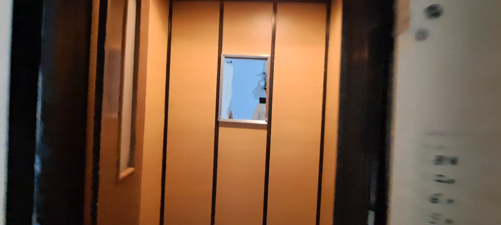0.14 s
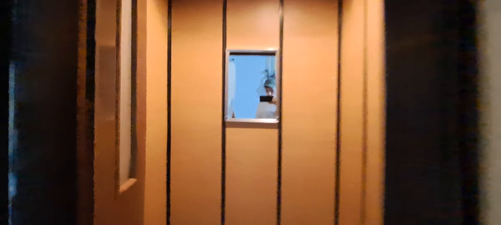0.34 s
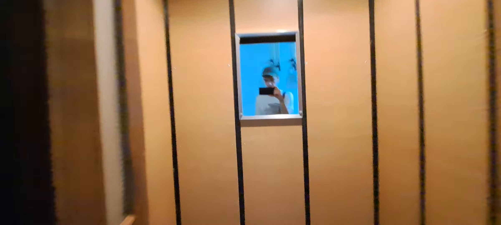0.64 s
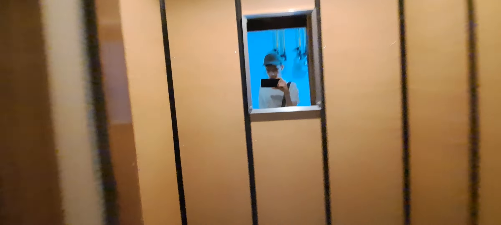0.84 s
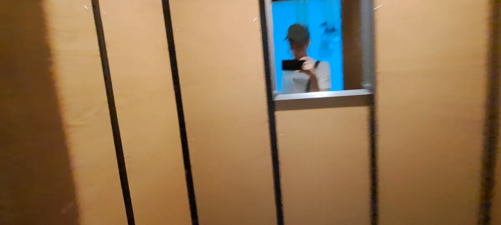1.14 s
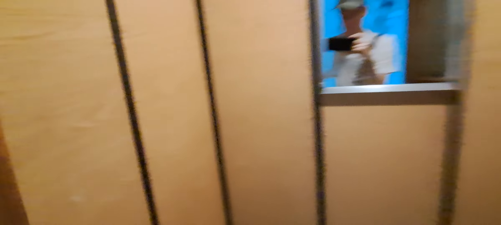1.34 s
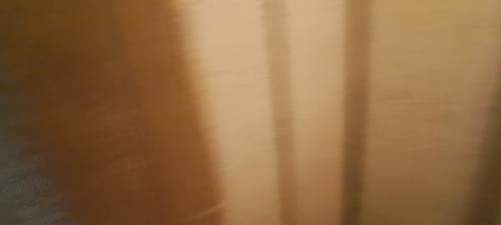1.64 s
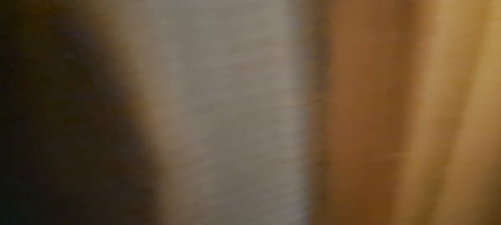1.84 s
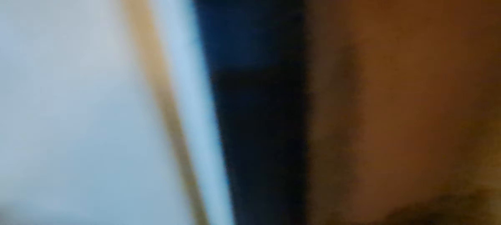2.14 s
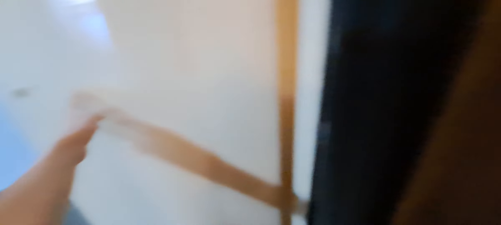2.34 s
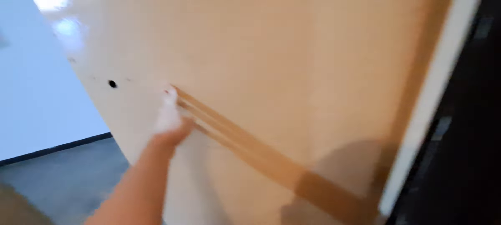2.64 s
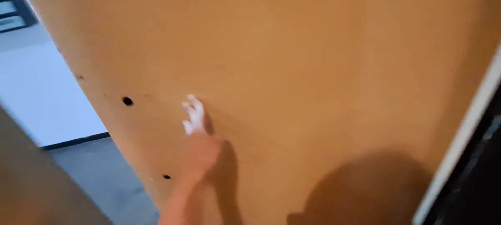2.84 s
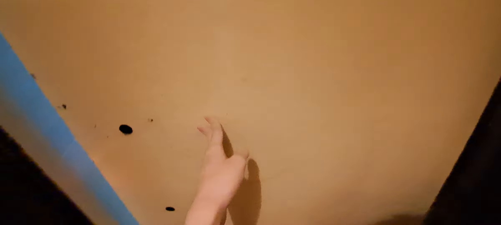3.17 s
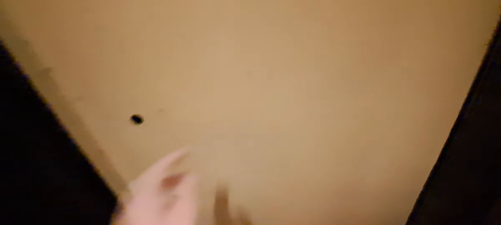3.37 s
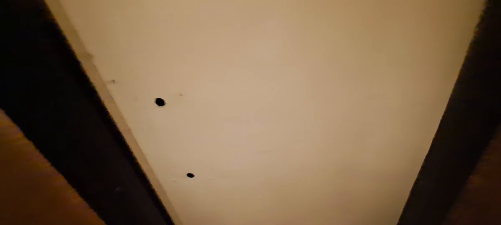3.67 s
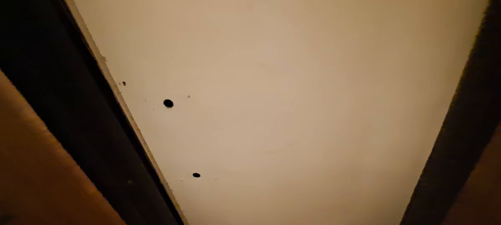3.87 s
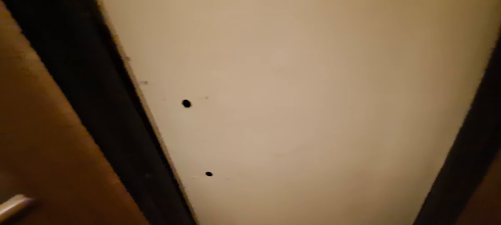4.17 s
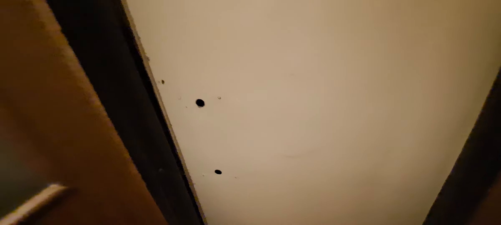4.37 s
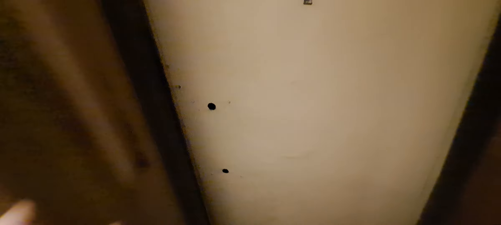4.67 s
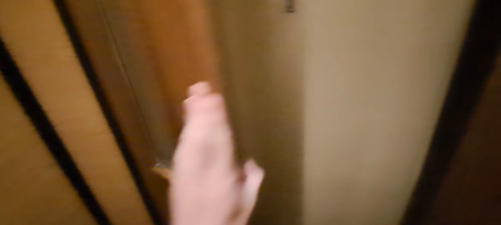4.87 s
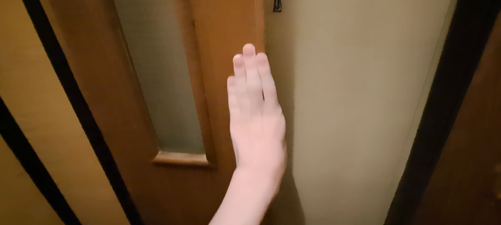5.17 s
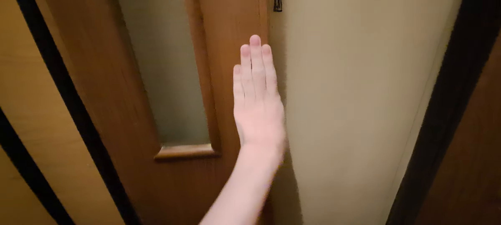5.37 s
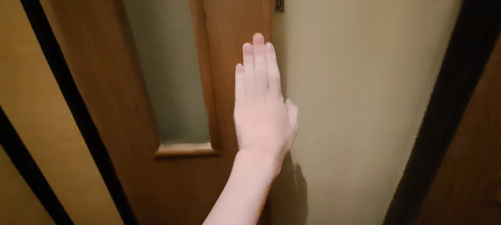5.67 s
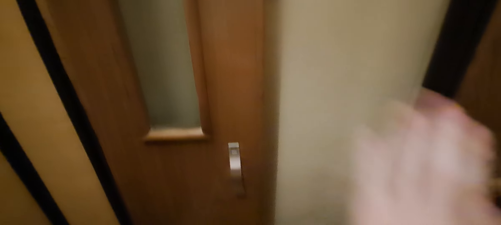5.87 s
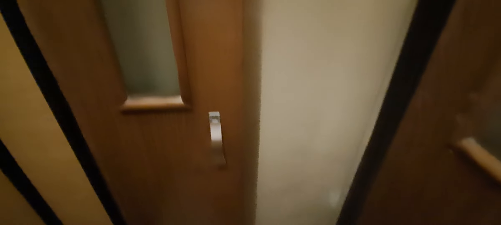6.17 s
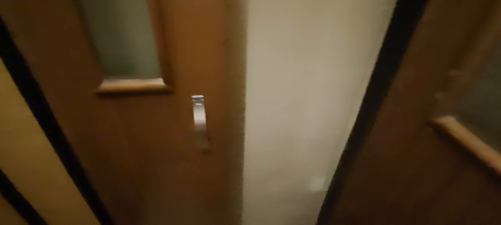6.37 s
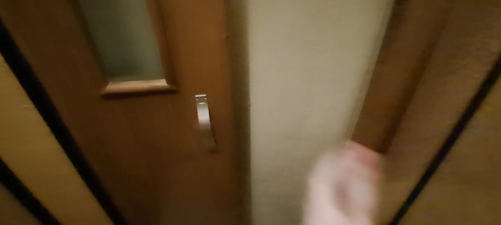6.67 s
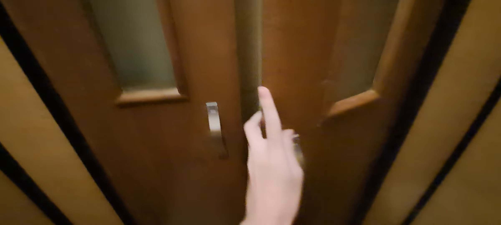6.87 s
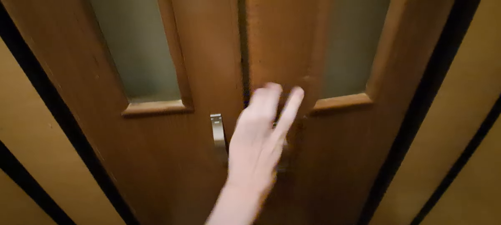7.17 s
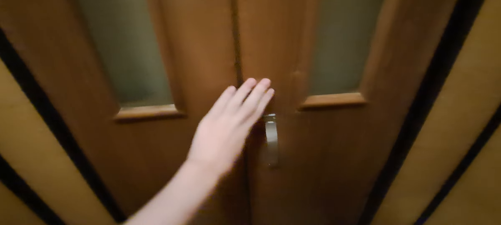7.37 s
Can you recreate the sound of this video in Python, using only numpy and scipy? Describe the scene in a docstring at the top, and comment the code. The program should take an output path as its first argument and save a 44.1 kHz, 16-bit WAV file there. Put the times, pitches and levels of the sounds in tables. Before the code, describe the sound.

Someone steps into a small old lift with a loud clack and a deep thump of the floor. Latches click and rattle, and the steel landing door bangs shut with a low ring. Wooden inner doors then clatter loudly and close with a last, softer knock. Hands, clothes and shoes rub in between, while faint stairwell air fades away. Hand-held stereo microphones hear it close in the narrow, echoing cabin.

```python
"""Latches clack and rattle as someone steps into a small old lift car, pulls the steel landing door
shut and folds the wooden car doors in. Each blow makes the panels ring low and shifts of weight bounce
the floor. There are rubbing strokes of hands, clothes and shoes, plus short bursts of noise on four
of the clacks. The airy noise of the stairwell fades as the doors close. A hand-held pair of
microphones hears it all in the narrow, echoing cabin."""
import sys
import numpy as np
from scipy import signal
from scipy.fft import rfft, irfft, next_fast_len
from scipy.io import wavfile
from scipy.ndimage import uniform_filter1d

SR = 44100
rng = np.random.default_rng(int(sys.argv[2]) if len(sys.argv) > 2 else 0)


def unload_audio(sound):
    """Save the sound as a 16-bit wav file, at the path given as the first command line argument."""
    columns = np.transpose(np.atleast_2d(sound))
    # keep every value between -1 and 1, then stretch to whole-number steps
    steps = np.round(np.clip(columns, -1, 1) * 32767)
    wavfile.write(sys.argv[1], SR, steps.astype(np.int16))


N = 331191

# the stairwell, shut out as the doors close: t/s, air noise/dB, share of the clacks that echoes/dB
STAIRWELL_LEVELS = [(0, -50.5, -7.5), (1.1, -57, -19.5), (2., -65, -10.5), (3.1, -58.5, -19),
                    (3.3, -67, -25), (5.3, -73, -27), (7.51, -81.5, -20.5)]


def amp(db):
    """Turns decibels into a gain."""
    return 10 ** (np.asarray(db) / 20)


def unit_level(x):
    """Scales a sound to an average (rms) level of 1."""
    return x / np.sqrt(np.mean(x ** 2) + 1e-20)


def at_pitch(points, hz):
    """Looks up a table's value at any frequency, on a log scale."""
    f, value = np.transpose(points)
    return np.interp(np.log(hz + 1), np.log(f + 1), value)


def curves(rows):
    """Joins a table's points in time with straight lines, one curve a column."""
    times, *columns = np.transpose(rows)
    return [np.interp(np.arange(N) / SR, times, column) for column in columns]


def swells(peak_s, rise_s, fall_s, db):
    """Summed power of humps that climb 20 dB in rise_s and sink 20 dB in fall_s (2 ms at least)."""
    late_s = np.arange(0, N / SR + .002, .001)[:, None] - peak_s
    rise_s, fall_s = np.maximum(rise_s, .002), np.maximum(fall_s, .002)
    drop_db = 20 * np.where(late_s < 0, -late_s / rise_s, late_s / fall_s)
    power = (amp(db - np.minimum(drop_db, 200)) ** 2).sum(1)
    return np.interp(np.arange(N) / SR, np.arange(len(power)) / 1000, power)


def filtered(x, gain):
    """Filters a sound by a gain given as a function of frequency."""
    size = next_fast_len(N)
    return irfft(rfft(x, size) * gain(np.fft.rfftfreq(size, 1 / SR)), size)[..., :N]


def band(low_hz, high_hz):
    """Gain that lets one band through, coloured by the microphone housing."""
    # colour of the housing: f/Hz, level/dB
    housing = [(310, -15.5), (520, -5.5), (618, -8), (673, -8.5), (1060, -6), (1280, -5.5), (1360, -5),
               (2210, -2.5), (2820, -9), (4730, -12), (5950, -23.5), (7380, -21), (9970, -28.5),
               (13500, -17), (16000, -24)]
    edges = lambda f: np.sqrt((1 + (low_hz / (f + 1)) ** 10) * (1 + (f / high_hz) ** 10))
    return lambda f: amp(at_pitch(housing, f)) / edges(f)


def grainy_noise(grain_db):
    """Stereo noise, alike on both sides in the bass, whose level flickers by about grain_db."""
    # how alike left and right are: f/Hz, likeness (1 same, 0 unrelated, -1 opposite)
    likeness = [(60, 0.87), (180, 1), (550, 0.57), (1650, -0.53), (4970, 0.061), (15000, -0.037)]
    alike = lambda f: np.clip(at_pitch(likeness, f), -1, 1)
    left, other = rng.standard_normal((2, N))
    right = filtered(left, alike) + filtered(other, lambda f: np.sqrt(1 - alike(f) ** 2))
    flicker = unit_level(uniform_filter1d(rng.standard_normal(N), size=90))
    return np.array([left, right]) * amp(grain_db * flicker)


def stairwell_air():
    """Distant air noise that fades as the doors shut it out."""
    # colour of the air noise: f/Hz, level/dB
    colour = [(18, -50), (30, -26.5), (58, -14.5), (165, 5.5), (282, -9.5), (351, -27), (420, -27.5),
              (730, -5.5), (2360, -16.5), (3370, -39.5), (6000, -42.5), (7800, -77), (13200, -120)]
    air = filtered(grainy_noise(grain_db=1.4), lambda f: amp(at_pitch(colour, f)))
    return amp(curves(STAIRWELL_LEVELS)[0]) * unit_level(air)


def latch_clacks():
    """Latches and door edges hit: a rattle dies away in six bands and the part rings at two pitches."""
    # clacks: t/s, clank/dB, mid/dB, upper/dB, treble/dB, low ring/Hz, low ring/dB, high ring/Hz,
    # rattle t60/s (time to fade by 60 dB), left over right/dB
    clacks = [(0.439, -56, -62, -61, -56, 1120, -61.5, 2400, 0.34, -1.5),
              (0.714, -54, -74, -69.5, -78, 830, -50, 2390, 0.091, -1),
              (0.9014, -54.5, -44.5, -64.5, -66.5, 605, -48, 1920, .17, 1),
              (1.0997, -44, -41, -53.5, -56.5, 490, -49, 2040, 0.065, -1.5),
              (1.1192, -51, -51, -50, -46, 1424, -49.5, 2380, 0.49, 2.5),
              (1.232, -42, -39, -68, -56, 1080, -36.5, 1700, 0.21, 5.5),
              (1.268, -24, -28.5, -40, -51.5, 1620, -33.5, 1860, 0.17, 0),
              (1.295, -14, -17.5, -26.5, -24, 1540, -19, 2140, 0.063, 3.5),
              (1.3284, -27.5, -23, -36.5, -40.5, 640, -26.5, 1640, .13, -1.5),
              (1.707, -47.5, -52, -63, -73, 490, -50, 2260, .14, -6.5),
              (1.813, -55.5, -67, -60, -68, 1040, -62, 2100, 0.3, -1),
              (2.16, -59.5, -54.5, -61, -56, 543, -66, 2130, 0.19, 1.5),
              (2.42, -53.5, -51, -54.5, -68, 974, -53, 2100, 0.31, 0),
              (2.546, -49, -51.5, -55, -45.5, 637, -47.5, 2070, 0.17, 2),
              (2.576, -40, -49, -46.5, -35, 1070, -50, 1980, 0.12, 0),
              (2.629, -45.5, -47, -48, -39, 560, -44, 2200, 0.07, 1.5),
              (2.685, -41.5, -54, -45, -46, 564, -36, 2350, 0.1, 3.5),
              (2.7248, -40, -40, -37.5, -34.5, 556, -35, 2240, 0.17, 0),
              (3.1092, -37, -36.5, -46.5, -61.5, 1609, -38, 1930, 0.7, 3),
              (3.116, -33.5, -42, -50, -66, 1500, -37.5, 2045, .1, 3.5),
              (3.1848, -19.5, -18, -29, -37.5, 1514, -17.5, 1880, .13, .5),
              (3.31, -48, -38, -57.5, -62.5, 660, -37, 1820, 0.19, -2),
              (3.531, -51, -43, -57.5, -80, 642, -44.5, 2390, 0.22, -.5),
              (3.933, -45, -47.5, -47, -36, 1520, -41.5, 1690, 0.42, 1),
              (4.0358, -38, -41, -50, -69, 810, -50, 2240, .17, -1),
              (4.0643, -39.5, -36, -44.5, -39.5, 850, -44, 1900, 0.16, -0.5),
              (4.204, -63, -58, -77, -85, 820, -58, 2360, .18, -3),
              (4.252, -55, -49, -65, -67, 510, -54, 2250, 0.16, 0),
              (4.373, -42, -49.5, -43.5, -50, 1059, -40.5, 1720, 0.16, 1),
              (4.439, -41, -51, -47.5, -46.5, 1146, -35.5, 2230, 0.13, 3.5),
              (4.5495, -48.5, -54.5, -48, -49, 967, -55, 2402, 0.31, 2),
              (4.952, -69, -84, -69, -64, 782, -62, 2163, 0.15, 3.5),
              (5.035, -39.5, -38.5, -33.5, -39, 1650, -32.5, 2125, 0.099, 1.5),
              (5.3449, -36.5, -25.5, -38, -45.5, 585, -30, 2312, 0.19, 0.5),
              (5.428, -21.5, -28, -23.5, -37, 1480, -23.5, 2520, 0.14, 4.5),
              (5.4461, -20, -16.5, -19, -24.5, 490, -24.5, 1980, 0.052, 0),
              (5.464, -22.5, -21, -26, -27, 460.5, -29.5, 2230, 0.21, 2.5),
              (5.5621, -24.5, -34, -30, -22.5, 1650, -30.5, 3010, 0.16, -0.5),
              (5.6189, -21.5, -24, -28, -26, 1270, -23.5, 2310, .14, 1),
              (5.696, -31.5, -37.5, -41, -36, 512, -41, 2980, 0.047, 5),
              (5.728, -22, -35, -28.5, -23, 1412, -36.5, 2200, 0.11, 1),
              (5.788, -29.5, -33, -48, -38.5, 1463, -32.5, 2283, 0.15, 2),
              (5.849, -41, -43, -41, -36.5, 1680, -36, 2180, 0.15, -0.5),
              (5.999, -53.5, -47, -64, -79, 890, -57.5, 2127, 0.14, -3.5),
              (6.08, -58, -57, -79, -73, 513, -72, 2135, 0.095, 2.5),
              (6.1875, -56.5, -74.5, -61.5, -78, 1595, -67, 2190, .1, -3),
              (6.394, -68, -66, -63, -78, 776, -67, 2260, 0.25, -3.5),
              (6.476, -58.5, -70, -62.5, -81, 1610, -72.5, 2665, .11, -2.5),
              (6.543, -57, -56, -80, -80, 597, -55, 2217, 0.16, -2),
              (6.7416, -66, -59, -98, -83, 650, -49, 1884, 0.23, -1.5),
              (7.056, -66, -74, -71.5, -68, 501, -81.5, 2050, .17, -1),
              (7.1678, -52, -83.5, -84.5, -76, 1162, -52, 2080, 0.28, -4),
              (7.273, -59.5, -72, -70, -72, 1180, -70, 2096, .12, -2.5),
              (7.3896, -33.5, -38, -50, -63.5, 1518, -42.5, 1990, 0.24, 3),
              (7.417, -36.5, -32, -40, -42.5, 1580, -43, 2210, 0.26, 2)]
    # the two in-between bands against their neighbours' mean: mid to clank/dB, clank to upper/dB
    gap_db = [-9.5, -10.5]
    rise_s, chatter_s = 0.0052, 0.0039
    snap_db, snap_s = 2.5, 0.0048  # extra bite at first contact
    bands = [band(1900, 2500), band(230, 992), band(4600, 6000), band(9000, 25000),  # clank to treble
             band(1200, 1900), band(2500, 4600)]  # in between
    powers, rings = np.zeros((6, 2, N)), np.zeros((2, N))
    t = np.arange(SR // 2) / SR
    rattle = grainy_noise(grain_db=2.)
    for time_s, clank, mid, upper, treble, low_hz, low_db, high_hz, t60, pan_db in clacks:
        start = round((time_s - .003) * SR)  # each clack starts sounding 3 ms before its listed time
        age = t[:N - start]
        span = slice(start, start + len(age))
        sides_db = np.array([[pan_db / 2], [-pan_db / 2]])
        attack = (1 - np.exp(-age / rise_s)) * amp(sides_db + snap_db * np.exp(-age / snap_s))
        fading_s = np.maximum(age - chatter_s, 0)
        treble_t60 = 0.083 + 0.43 * t60
        band_db = clank, mid, upper, treble, (clank + mid) / 2 + gap_db[0], (clank + upper) / 2 + gap_db[1]
        band_t60 = t60, 1.43 * t60, (t60 + treble_t60) / 2, treble_t60, t60, t60
        for power, db, decay_s in zip(powers, band_db, band_t60):
            power[:, span] += (attack * amp(db - 60 * fading_s / decay_s)) ** 2
        for hz, db, width_hz in (low_hz, low_db, 170.), (high_hz, clank - 3.5, 450.):
            radius = np.exp(-np.pi * width_hz / SR)
            resonator = [1, 0, -1, 1, -2 * radius * np.cos(2 * np.pi * hz / SR), radius ** 2]
            ring = signal.sosfilt([resonator] * 2, rattle[:, span])  # twice, for a clearer pitch
            rings[:, span] += unit_level(ring) * attack * amp(db - 60 * fading_s / (0.67 * t60))
    return rings + sum(np.sqrt(power) * unit_level(filtered(rattle, gain))
                       for power, gain in zip(powers, bands))


def floor_bounce():
    """Shifts of weight jolt the floor: a deep tone with a weak overtone and a loose rumble."""
    # jolts: peak t/s, level/dB, fall/s
    jolts = [(.44, -58, 0.5), (.58, -47, -0.1), (.84, -46, -2.5), (1.12, -32.5, 0.2), (1.335, -11, 0.23),
             (1.44, -23.5, 0.16), (1.495, -17, .08), (1.64, -27, 0.24), (1.81, -32.5, .3),
             (1.9, -38, -0.36), (2.09, -45, 0.6), (2.24, -43, 1), (2.39, -42, 0.2), (2.71, -37, -0.2),
             (2.8, -31.5, 0.18), (2.97, -34, -0.3), (3.14, -36, 0.34), (3.2, -28, 0.22), (3.3, -38, 0.4),
             (3.47, -37, -0.1), (3.64, -37.5, -0.2), (3.81, -41, 0.9), (4.04, -25.5, 0.17),
             (4.31, -33, 0.12), (4.44, -27.5, 0.24), (4.75, -40.5, 0.33), (5.06, -36, 0.17),
             (5.23, -39.5, .15), (5.35, -42.5, -0.7), (5.46, -21.5, 0.1), (5.54, -22, 0.28),
             (5.67, -22.5, 0.12), (5.84, -30.5, 0.33), (6.04, -40, -0.15), (6.23, -46, 0.2),
             (6.4, -51.5, -0.1), (6.61, -42.5, 0.14), (6.72, -47, 0), (6.86, -56, 0.3), (6.94, -55.5, 1),
             (7.17, -43, 0.04), (7.43, -31.5, 0.3)]
    # pitch of the floor, set by where the weight stands: t/s, f/Hz
    pitch = [(0, 41.3), (.4, 42.17), (.9, 49.1), (1.1, 55.5), (1.35, 55.07), (1.45, 51.96), (2.03, 54.32),
             (2.5, 50.83), (2.72, 55.24), (3., 52.2), (3.35, 56.54), (3.45, 46), (4.2, 44.7), (4.45, 47.25),
             (5.35, 50.6), (6., 45.44), (6.55, 53.1), (6.7, 49), (7.07, 58.15), (7.35, 54.2), (7.51, 47.9)]
    rise_s, rest_db = 0.045, -67.5
    peak_s, db, fall_s = np.transpose(jolts)
    level = np.sqrt(swells(peak_s, rise_s, fall_s, db) + amp(rest_db) ** 2)
    phase = 2 * np.pi * np.cumsum(curves(pitch)[0]) / SR
    deep_bass = lambda f: 1 / ((1 + (25 / (f + 1)) ** 4) * (1 + (f / 70) ** 4))
    rumble = unit_level(filtered(rng.standard_normal(N), deep_bass))
    return level * (np.sqrt(2) * np.sin(phase) + amp(-19.5) * np.sin(2 * phase) + amp(-7.0) * rumble)


def rubs_and_bursts():
    """Rubbing strokes, plus short bursts of noise on four latch clacks: a scuff, a swish and a hiss."""
    # rubbing strokes and the four bursts (at 2.578, 4.066, 4.454 and 5.041 s):
    # peak t/s, rise/s, fall/s, scuff/dB, swish/dB, hiss/dB
    strokes_and_bursts = [(.466, 0.03, 0.14, -69, -52.5, -57), (.55, 0.22, 0.74, -57, -58.5, -70.5),
                          (.9, 0.33, 1, -58, -59.5, -70), (.94, -0.04, -0.5, -42, -67, -75),
                          (1.45, .2, 0.47, -45.5, -56, -69.5), (1.731, 0.14, 0.16, -48, -51.5, -68),
                          (1.888, 0.3, 0.1, -57, -54, -65.5), (2.206, 0.1, 0.16, -57, -51, -62),
                          (2.42, 0.13, .5, -53, -49.5, -64.5), (2.578, 0.01, 0.03, -45, -43.5, -43),
                          (2.736, 0.14, 0.18, -46, -47.5, -65), (2.956, 0.56, .07, -53.5, -47.5, -56.5),
                          (3.35, 0.5, 0.27, -48.5, -66, -68), (3.599, 0.07, 0.1, -64, -51.5, -62.5),
                          (3.826, 0.06, .5, -63, -54, -56), (4.066, 0.0456, 0.03, -37, -39.5, -63),
                          (4.28, 0.1, .5, -60, -56.5, -75), (4.454, 0.08, 0.0248, -38, -47.5, -56),
                          (4.562, .09, 0.21, -49, -55, -50.5), (4.694, 0.1064, 0.06, -55, -35, -41),
                          (4.988, -0.48, 0.2, -50.5, -61, -82), (5.041, -0.0174, 0.0359, -38, -37, -44.5),
                          (5.92, .5, .07, -52.5, -49, -56.5), (6.02, -0.5, 0.12, -57, -57, -73),
                          (6.198, 0.1, 0.27, -63, -63, -74.5), (6.48, 0.03, -0.3, -66, -63, -74),
                          (6.546, .03, 0, -62, -67, -89), (6.75, 0.8, 0.2, -69, -78, -84),
                          (7.172, -0.66, 0.1, -80, -65, -77)]
    # faint rustle underneath: t/s, scuff/dB, swish/dB, hiss/dB
    rustle = [(0, -62.5, -69.5, -78), (.4, -59.5, -75, -79), (2.1, -60.5, -71, -86), (3.7, -69.5, -76, -83),
              (5.2, -74, -72.5, -72.5), (6.3, -84, -83, -86.5), (7.2, -84, -77, -78),
              (7.51, -86.5, -79, -74.5)]
    noise = grainy_noise(grain_db=1.0)
    bands = [band(300, 1100), band(1500, 9000), band(8600, 15000)]
    peak_s, rise_s, fall_s, *peak_db = np.transpose(strokes_and_bursts)
    sound = 0
    for db, rustle_db, gain in zip(peak_db, curves(rustle), bands):
        level = np.sqrt(swells(peak_s, rise_s, fall_s, db) + amp(rustle_db) ** 2)
        sound += level * unit_level(filtered(noise, gain))
    return sound


def panel_tones(modes, t):
    """A struck panel's own tones (modes): fading sines of alternating sign, one row each."""
    return np.array([(-1) ** k * amp(db - 60 * t / t60) * np.sin(2 * np.pi * hz * t)
                     for k, (hz, db, t60) in enumerate(modes)])


def favoured(modes, hz, octaves):
    """How strongly each tone rings when the struck spot favours one pitch."""
    distance = np.log2(np.transpose(modes)[0] / hz)
    return np.exp(-(distance / octaves) ** 2 / 2)


def panel_thuds():
    """Blows and a random shiver ring the car walls, the steel door and the wooden door leaves."""
    # blows: t/s, walls/dB, steel door/dB, whole wooden leaf/dB, its frame/dB,
    # favoured f/Hz in the walls, favoured f/Hz in the frame
    thuds = [(0.902, -52, -68, -53.5, -59.5, 121, 603), (1.092, -39.5, -55, -42.5, -52, 96.6, 473),
             (1.268, -24, -29, -40, -36, 96.9, 384), (1.288, -11.5, -22.5, -24.5, -21, 97.3, 362),
             (1.315, -24.5, -26, -41.5, -21.5, 94.6, 400), (1.334, -22.5, -37.5, -24, -28.5, 96.3, 296),
             (1.468, -27.5, -37, -34, -58, 96.2, 300), (1.708, -38, -47, -36, -45, 128.6, 423),
             (2.419, -45, -35, -62, -45.5, 135, 384), (2.575, -38.5, -50, -52, -40, 99.6, 400),
             (2.724, -49, -49.5, -36.5, -40, 135, 389.6), (2.8, -43, -36, -44, -47, 96.9, 296),
             (3.11, -34, -27.5, -37, -31, 96.7, 376.4), (3.186, -22, -16.5, -28, -22.5, 95, 321),
             (3.209, -28, -13, -25, -23.5, 134.3, 385), (3.235, -27.5, -26.5, -28, -42, 97.3, 320),
             (3.311, -25.5, -23, -38.5, -31, 136, 303), (3.529, -37, -38, -54, -43.5, 99.6, 350),
             (4.03, -33, -33.5, -35.5, -34.5, 97, 344), (4.08, -25, -30, -41, -33, 137, 323),
             (4.258, -26.5, -37, -39, -34.5, 93, 355), (4.29, -49, -38, -37.5, -39, 110, 312),
             (4.376, -32, -41, -48, -53, 95.6, 301), (5.037, -47, -46.5, -41.5, -38, 102, 360),
             (5.348, -31.5, -43.5, -31.5, -20.5, 96.9, 540), (5.445, -14, -26, -23.5, -12, 113, 389),
             (5.469, -20.5, -43.5, -27, -21, 135.4, 425), (5.51, -23, -44, -22, -32, 117.8, 350),
             (5.62, -26, -29.5, -31.5, -36.5, 113, 318), (5.728, -26.5, -41, -40.5, -36.5, 102.6, 342),
             (5.838, -33, -61.5, -44, -39, 96.4, 337), (6.541, -47.5, -53, -75, -48, 97.4, 348.6),
             (6.598, -57, -71, -72, -55, 108, 350), (6.738, -63, -63, -72, -48.5, 96.9, 350),
             (7.415, -25, -35, -32.5, -33, 123.7, 365), (7.434, -29.5, -46, -38, -29, 124.6, 380)]
    # tones of the walls, the steel and the wood: f/Hz, level/dB, t60/s
    wall_modes = [(85.4, 1.5, 0.18), (104.1, -7, 0.5), (125.4, -1.5, 0.27)]
    steel_modes = [(159, -21, 1), (168.3, -2, 0.7), (189.2, -2, 0.65), (207.5, -2, 0.37)]
    wood_modes = [(239.6, 2, 0.2), (258.8, -0.5, 0.33), (287.5, 0, .25), (334.1, 3.5, 0.24), (383, 0, 0.2),
                  (413.8, -2, 0.22), (466.2, -3.5, 0.45), (563, -6.5, 0.022), (662, -1.5, 0.049)]
    # faint shiver between blows: t/s, walls/dB, steel/dB, wood/dB
    faint_shiver = [(0, -56.5, -75, -62.5), (.58, -59, -54, -61), (1.05, -87, -63, -66.5),
                    (1.2, -47, -38.5, -44), (1.6, -49.5, -55, -46.5), (2.2, -53, -59, -59),
                    (2.47, -61, -45, -50.5), (2.72, -44.5, -37.5, -41.5), (3.1, -62.5, -60.5, -60),
                    (3.6, -59, -45, -53.5), (3.85, -54, -57, -57), (4.15, -45, -40, -43.5),
                    (4.5, -52.5, -60.5, -56.5), (5.3, -57.5, -70, -64.5), (5.7, -36, -54, -35.5),
                    (6.05, -44.5, -60, -52), (6.2, -58.5, -65.5, -64), (6.55, -68, -74.5, -71),
                    (6.75, -65, -79, -64), (7.51, -60.5, -71, -75.5)]
    # shiver after a blow, against the blow's own level: walls/dB, steel/dB, wood/dB
    after_db = [-13.5, -11, -9.5]
    t = np.arange(SR // 2) / SR
    walls, steel, wood = (panel_tones(modes, t) for modes in (wall_modes, steel_modes, wood_modes))
    attack = 1 - np.exp(-t / .003)
    blows = np.zeros(N + len(t))
    for time_s, wall_db, steel_db, leaf_db, frame_db, wall_hz, frame_hz in thuds:
        ring = amp(wall_db) * favoured(wall_modes, wall_hz, octaves=0.28) @ walls
        ring += amp(steel_db) * steel.sum(0)
        ring += amp(leaf_db) * favoured(wood_modes, hz=255., octaves=.1) @ wood
        ring += amp(frame_db) * favoured(wood_modes, frame_hz, octaves=0.13) @ wood
        blows[round(time_s * SR):][:len(t)] += ring * attack
    shaking = grainy_noise(grain_db=4.)
    blow_s, *blow_db = np.transpose(thuds)[:4]
    shiver = 0
    for tones, faint_db, db, offset in zip((walls, steel, wood), curves(faint_shiver), blow_db, after_db):
        after_blows = swells(blow_s + .05, rise_s=.04, fall_s=0.12, db=db + offset)
        level = np.sqrt(amp(faint_db) ** 2 + after_blows)
        shiver += level * unit_level(signal.oaconvolve(shaking, tones.sum(0)[None])[:, :N])
    return blows[:N] + shiver


def door_swing():
    """The last door leaf swings with a faint, hollow rub."""
    # loudness of the swing: t/s, level/dB
    swing = [(6.6, -70), (6.804, -69), (7.29, -63), (7.38, -80.5)]
    # colour of the rub: f/Hz, level/dB
    colour = [(200, -50), (300, -20), (357, -3), (400, -14), (430, 1.5), (520, -30), (1400, -38),
              (1700, -13), (2200, -14), (2600, -30), (3400, -46), (4400, -22), (5000, -30), (6500, -55)]
    t = np.arange(N) / SR
    moving = (t > swing[0][0]) * (t < swing[-1][0])
    rub = filtered(grainy_noise(grain_db=-2.0), lambda f: amp(at_pitch(colour, f)))
    return moving * amp(curves(swing)[0]) * unit_level(rub)


def echoes(x, decays):
    """Random reflections, different left and right, with each band dying at its own speed."""
    reflections = np.zeros((2, SR))
    slots = np.arange(100, SR - 20, 20)
    arrivals = slots + rng.integers(0, 20, (2, len(slots)))
    np.put_along_axis(reflections, arrivals, rng.choice([-1., 1.], arrivals.shape), 1)
    hz, t, spectrum = signal.stft(reflections, SR, nperseg=256)
    fade = amp(-60 * t / at_pitch(decays, hz)[:, None])
    tail = signal.istft(spectrum * fade, SR, nperseg=256)[1]
    return signal.fftconvolve(x, tail / np.linalg.norm(tail[0]), axes=1)[:, :N]


def scene():
    """Clacks and thuds with their echoes, over the bouncing floor, rubs, noise bursts and air."""
    # how long the cabin and the stairwell echo: f/Hz, t60/s
    cabin_decay = [(300, .3), (1000, .3), (3000, .25), (8000, .15), (16000, .12)]
    stairwell_decay = [(300, 0.33), (1000, 0.75), (3000, 0.97), (6000, 0.64), (12000, .15)]
    clacks, thuds = latch_clacks(), panel_thuds()
    cabin = echoes(amp(-8.5) * clacks + amp(-12.5) * thuds, cabin_decay)
    stairwell = echoes(clacks * amp(curves(STAIRWELL_LEVELS)[1]), stairwell_decay)
    hits = clacks + thuds + cabin + stairwell
    return hits + floor_bounce() + rubs_and_bursts() + door_swing() + stairwell_air()


def record(dry):
    """Two unequal microphones softly squash the loudest peaks and lose the highest treble."""
    # the left microphone is partly shaded: f/Hz, left over right/dB
    shading = [(60, -2.5), (99, -1.5), (160, -1), (270, -1.5), (450, -2.5), (740, -3.0), (1220, -5.5),
               (2010, -13), (3330, -10), (5500, -10.0), (9080, 0.5), (15000, -5)]
    ceiling, top_hz = .99, 15900
    mics = filtered(dry, lambda f: amp(np.array([[.5], [-.5]]) * at_pitch(shading, f)))
    squashed = mics / (1 + (mics / ceiling) ** 4) ** .25
    lowpass = signal.firwin(511, top_hz, window=("kaiser", 9), fs=SR)
    return signal.oaconvolve(squashed, lowpass[None], "same")


dry = scene()
out = record(dry)
unload_audio(out)
```